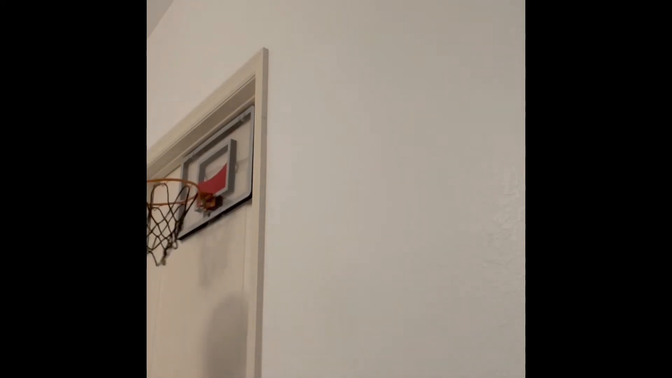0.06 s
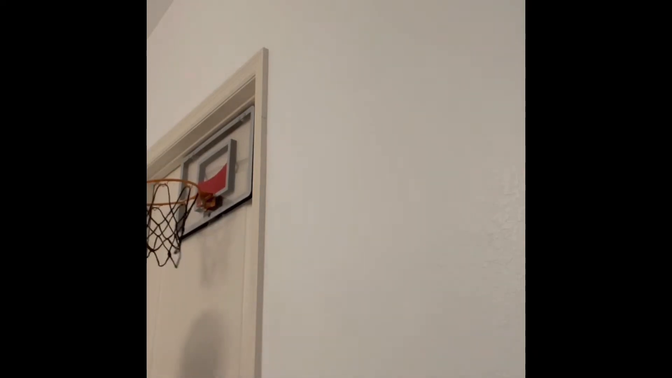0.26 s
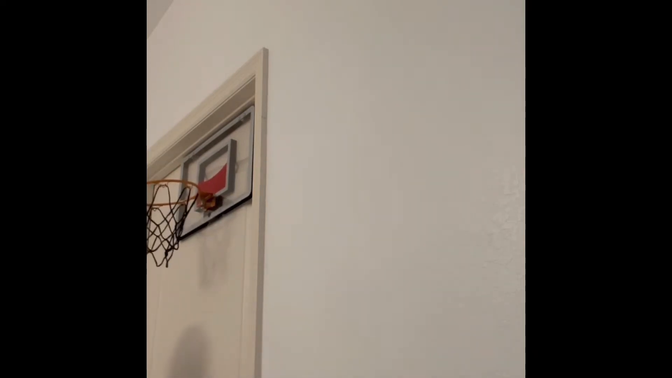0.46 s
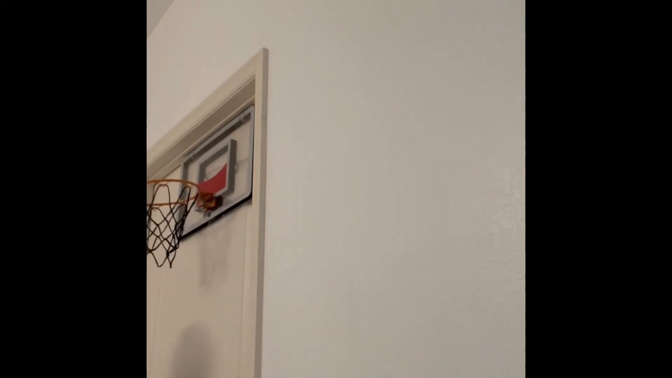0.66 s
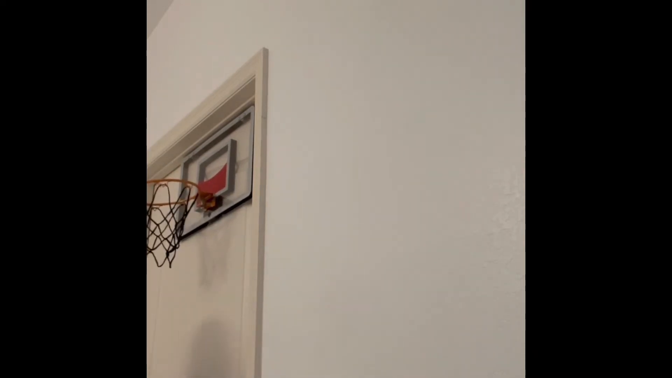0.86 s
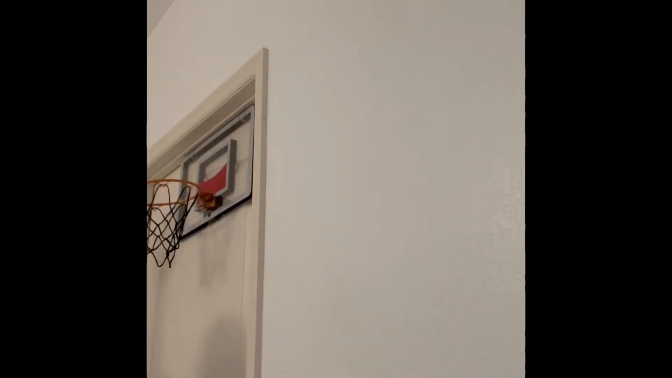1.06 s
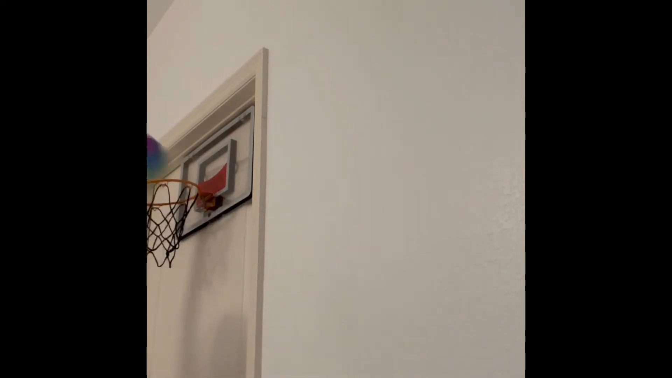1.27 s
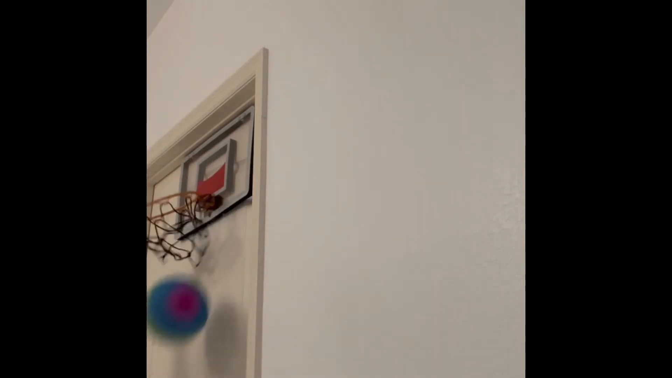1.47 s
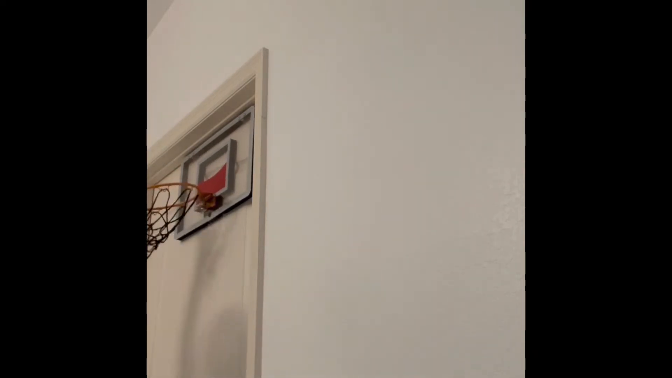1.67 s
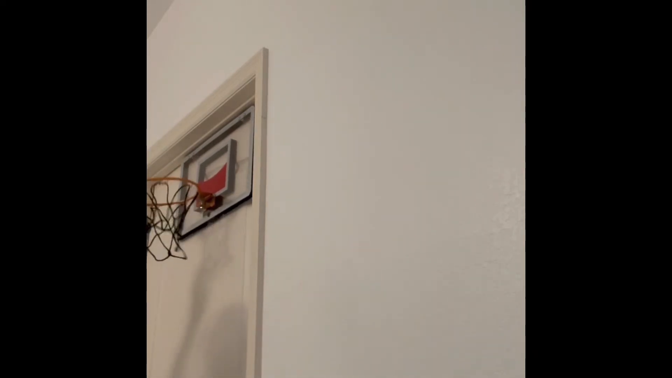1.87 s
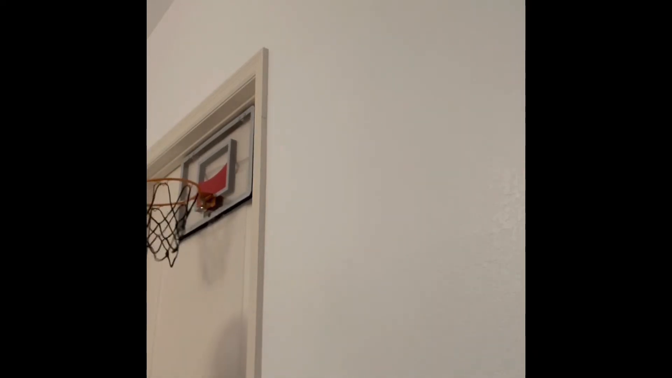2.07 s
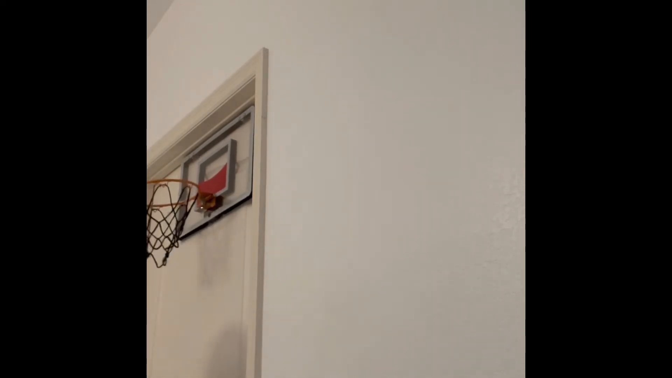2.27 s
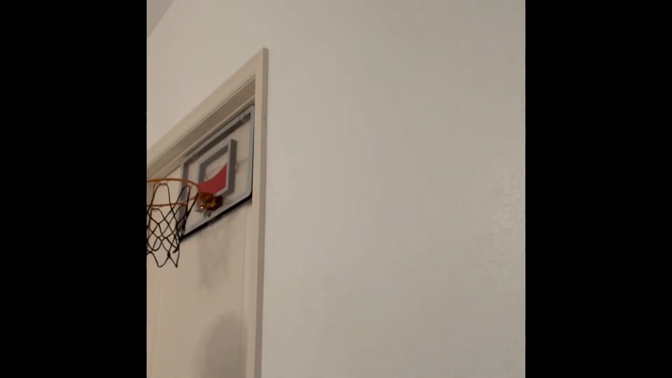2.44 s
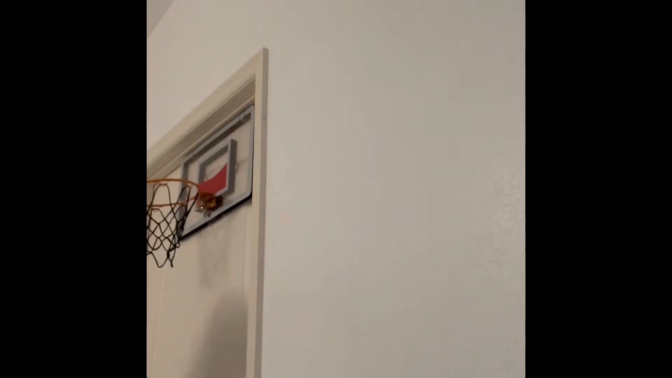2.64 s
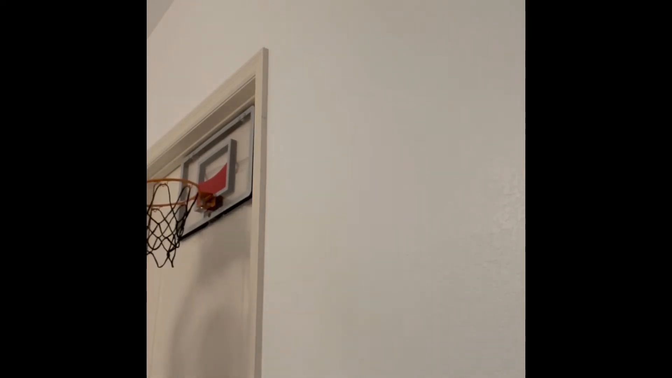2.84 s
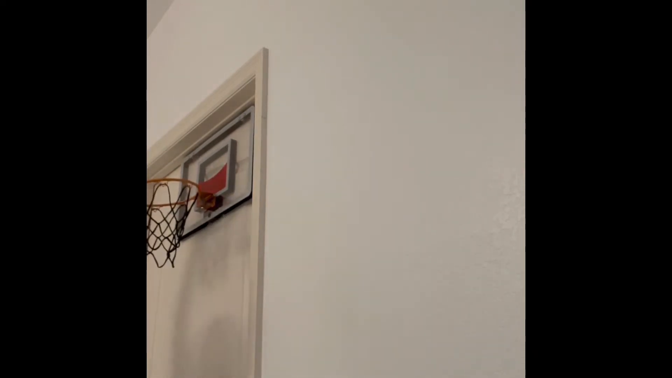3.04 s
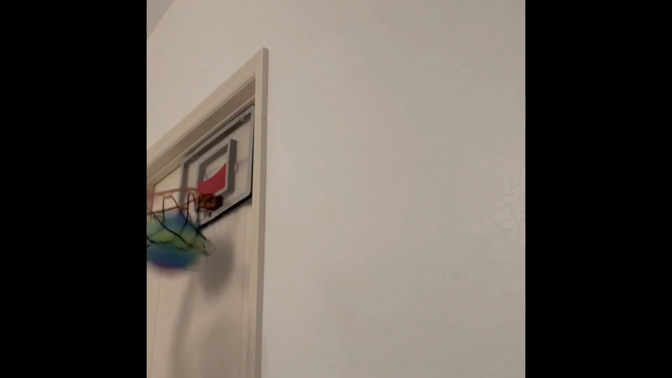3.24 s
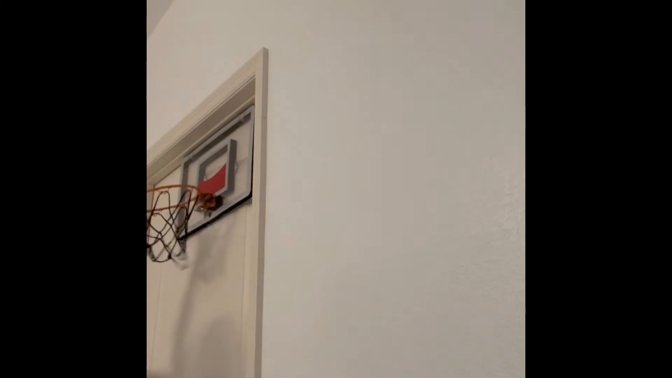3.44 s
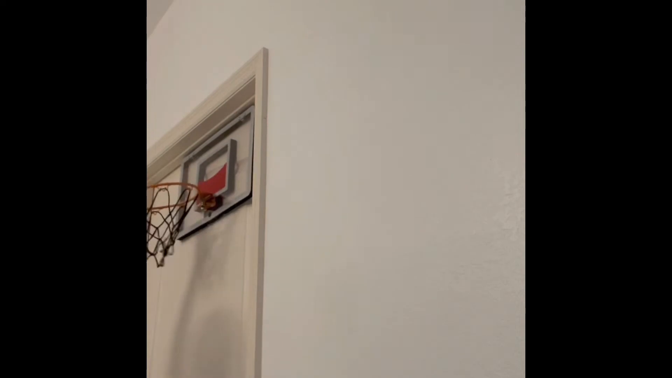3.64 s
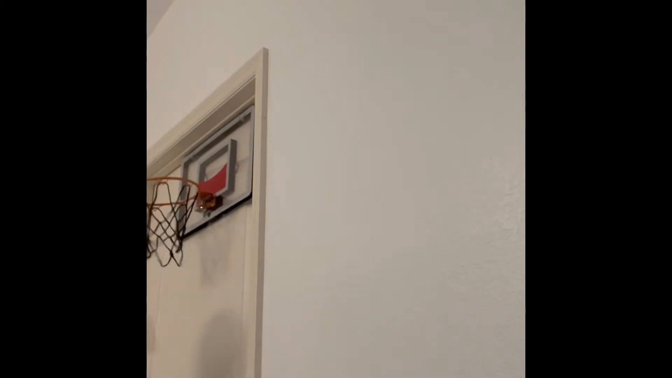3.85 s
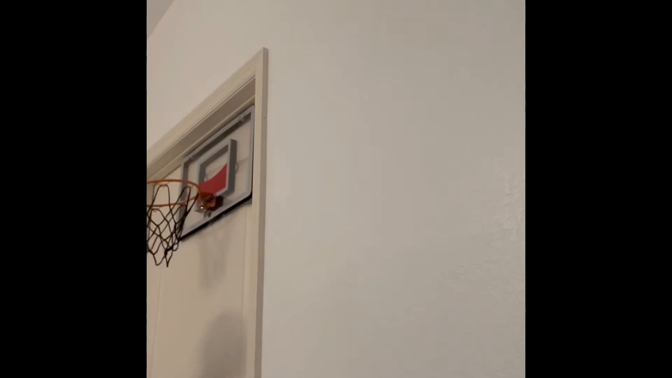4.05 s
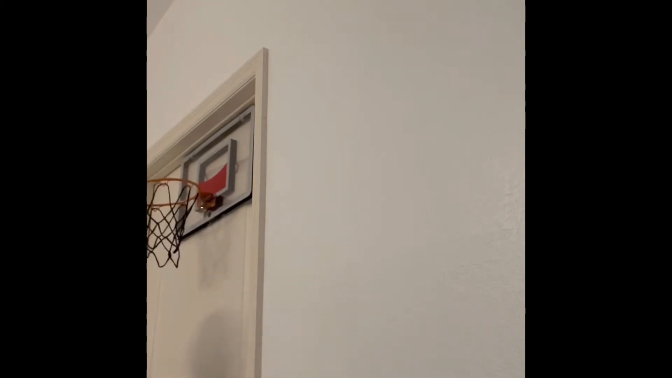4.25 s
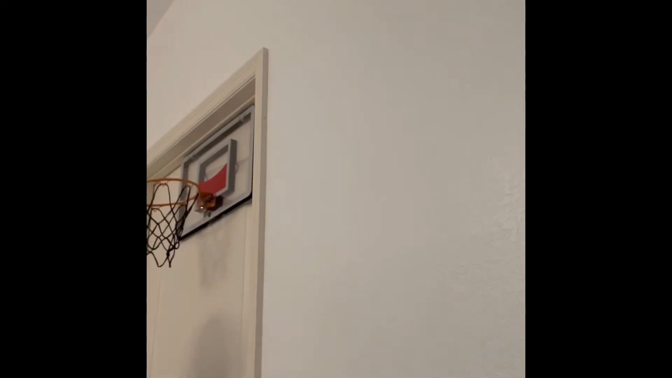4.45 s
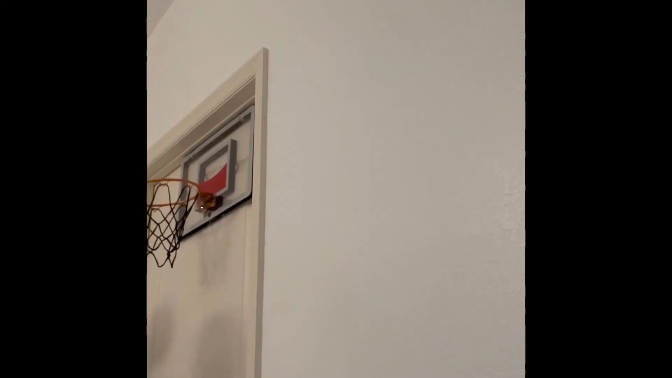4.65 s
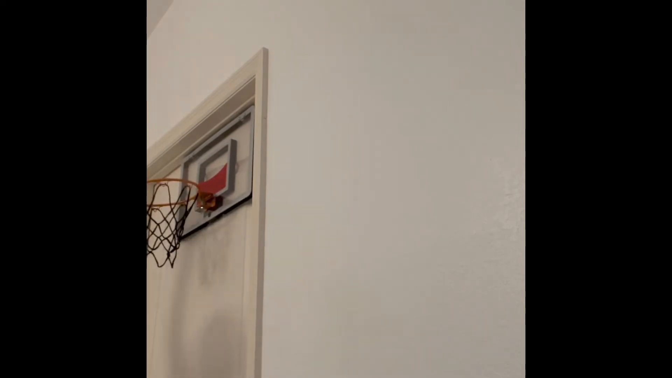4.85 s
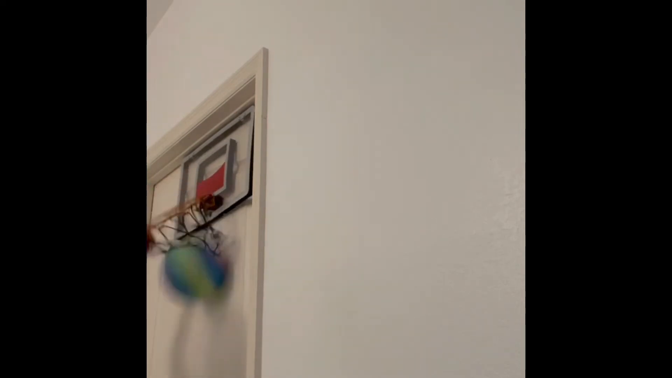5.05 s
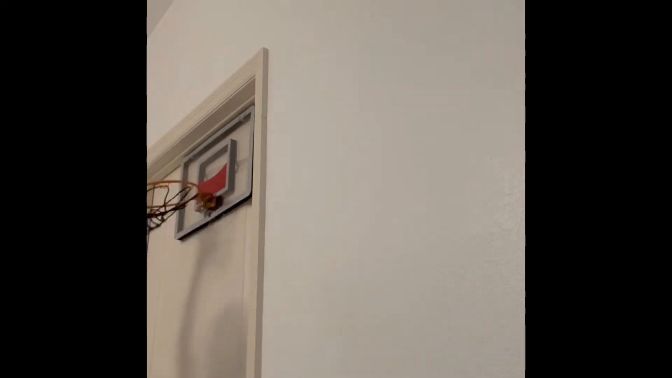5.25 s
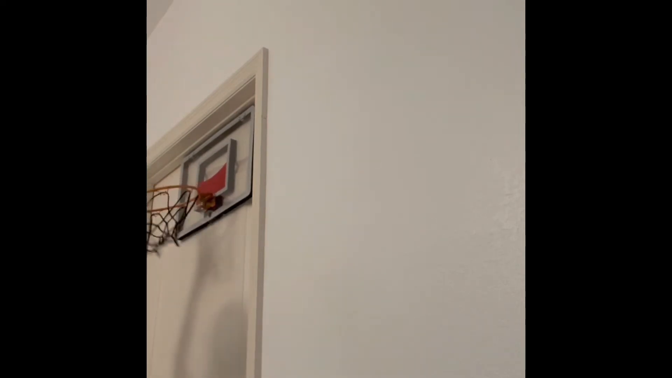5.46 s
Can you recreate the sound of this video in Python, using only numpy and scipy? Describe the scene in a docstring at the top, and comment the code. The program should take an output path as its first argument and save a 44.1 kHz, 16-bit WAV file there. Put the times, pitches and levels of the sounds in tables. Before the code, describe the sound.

In a bare, echoing room, a loose backboard clatters against a door three times while a hollow ball smacks and bounces below.

```python
"""Dunks on a door-hung hoop

Three dunks on a small hoop in a bare room, beginning as a ball bounces and ending on its last landing.
The backboard slams the door as runs of noise bursts, with steel rim and door panel as decaying modes.
The ball slaps the floor as noise bursts while its hollow body and enclosed air ring as modes.
Filtered-noise clothes rustle, soft steps and ticks fill the gaps over house noise and thin tones.
"""
import sys
import numpy as np
from scipy import signal
from scipy.fft import rfft, irfft
from scipy.io import wavfile
from scipy.ndimage import uniform_filter1d

SR = 44100
rng = np.random.default_rng(int(sys.argv[2]) if len(sys.argv) > 2 else 0)


def generate_wav(signal):
    """Clip the signal to [-1, 1] and save it as 16-bit WAV at the path in sys.argv[1]."""
    frames = np.transpose(np.atleast_2d(signal))
    scaled = np.clip(frames, -1, 1) * 32767
    pcm = np.round(scaled).astype(np.int16)
    wavfile.write(sys.argv[1], SR, pcm)


N = 242991
LEAD = SR // 2  # samples of run-in, so that sounds begun before time zero can ring on


def undb(db):
    """Level law: 20 dB is a tenfold amplitude."""
    return 10 ** (np.asarray(db) / 20)


def unit(x):
    """Normalisation to a root-mean-square of 1."""
    return x / np.sqrt(np.mean(x ** 2))


def colour(x, points):
    """Minimum-phase filtering: folding the cepstrum of the gain gives a causal response of energy 1."""
    hz, db = np.transpose(points)
    size = 4096
    bin_hz = np.arange(size // 2 + 1) * SR / size
    log_gain = np.interp(np.log(bin_hz + 1), np.log(hz), db) * np.log(10) / 20
    cepstrum = irfft(log_gain)
    cepstrum[1:size // 2] *= 2
    cepstrum[size // 2 + 1:] = 0
    response = irfft(np.exp(rfft(cepstrum)))
    response /= np.sqrt(np.sum(response ** 2))
    return signal.fftconvolve(x, response)[:len(x)]


def band(x, hz, width):
    """Simple resonance: two poles pass a band of the given width in Hz."""
    b, a = signal.iirpeak(min(hz, .45 * SR), hz / width, SR)
    return signal.lfilter(b, a, x)


def treble(x, hz):
    """High-pass filtering: keeps the part above hz."""
    return signal.sosfilt(signal.butter(4, hz, "high", fs=SR, output="sos"), x)


def decay(t, t60):
    """Exponential damping: the level falls 60 dB in t60 seconds."""
    return np.exp(-np.log(1000) * t / t60)


def ring(modes, scatter_db, seconds=.25):
    """Modal superposition: a blow excites damped modes, each by an amount set by where it lands."""
    hz, db, t60 = np.transpose(modes)[:, :, None]
    t = np.arange(int(seconds * SR)) / SR
    detune, strength = rng.standard_normal((len(modes), 2)).T[:, :, None]
    waves = np.sin(2 * np.pi * hz * (1 + 0.0084 * detune) * t) * decay(t, t60)
    gains = np.sign(detune) * undb(db + scatter_db * strength)  # random polarity and level
    return np.sum(gains * waves, axis=0)


def contact(spread, rise=1e-4):
    """Stochastic contact: a noise burst of micro-contacts gathers and dies, with energy 1."""
    t = np.arange(SR // 8) / SR
    envelope = np.exp(-t / max(spread, 1e-4)) * (1 - np.exp(-t / max(rise, 1e-5)))
    touch = rng.standard_normal(len(t)) * envelope
    return touch / np.sqrt(np.sum(touch ** 2))


def drawn_out(x, spread):
    """Distributed excitation: a swell of small contacts feeds in the same energy as one blow."""
    t = np.arange(SR // 8) / SR
    y = signal.fftconvolve(t * contact(spread), x)
    return y * np.sqrt(np.sum(x ** 2) / np.sum(y ** 2))


def thump(hz, t60):
    """Damped oscillator: one dying swing at a single pitch."""
    t = np.arange(SR // 2) / SR
    return np.sin(2 * np.pi * hz * t) * decay(t, t60)


def swell(s, hold, attack, release):
    """Amplitude envelope: rises into s, holds, then dies away."""
    t = np.arange(N) / SR - s
    return np.clip(1 + t / attack, 0, 1) ** 2 * np.exp(-np.maximum(t - hold, 0) / release)


def add(out, s, x):
    """Linear superposition: adds x at time s, after the run-in."""
    at = LEAD + int(s * SR)
    out[at:at + len(x)] += x[:len(out) - at]


# Spectrum of the house noise: pitch_hz [Hz], level_db [relative dB per Hz]
HOUSE_SPECTRUM = [(20, -20), (40, -2), (65, 7), (100, 1), (150, -11), (300, -11), (600, -14), (1200, -18),
                  (2500, -25), (5000, -30), (9000, -35.5), (16000, -33)]
# Thin appliance tones: pitch_hz [Hz], level_db [dB rms before the waver]
HUM_TONES = [(573, -59.5), (1130, -69.5), (2270, -76.5), (240, -66.5), (490, -67.5), (834, -69.5)]
HOUSE_DB = -49.5  # dB rms


def house():
    """Stationary noise with amplitude-modulated tones: a steady background and a wavering appliance."""
    t = np.arange(N) / SR
    out = undb(HOUSE_DB) * unit(colour(rng.standard_normal(N), HOUSE_SPECTRUM))
    for hz, db in HUM_TONES:
        waver = unit(uniform_filter1d(rng.standard_normal(N), size=4000))
        tone = np.sqrt(2) * np.sin(2 * np.pi * (hz * t + rng.random()))
        out += undb(db + 1.5 * waver) * tone
    return out


# Decay of the room: pitch_hz [Hz], t60_s [s]
ROOM_DECAY = [(60, 0.54), (150, 0.72), (400, 0.67), (1000, 0.77), (2500, 0.65), (6000, 0.57), (10000, 0.5),
              (15000, 0.14)]


def octave_slices():
    """Frequency-dependent absorption: half-octave filters, each with the room's decay time there."""
    hz, t60 = np.transpose(ROOM_DECAY)
    for f in 40 * 2 ** np.arange(0, 9, .5):
        edges = [f / 2 ** .25, min(f * 2 ** .25, .49 * SR)]
        sos = signal.butter(2, edges, "band", fs=SR, output="sos")
        yield sos, np.interp(np.log(f), np.log(hz), t60)


# Standing waves of the room: pitch_hz [Hz], level_db [relative dB], t60_s [s]
STANDING_WAVES = [(49.4, -0.5, 0.81), (64.6, 4.5, 0.6), (80, 12, 0.1), (109.9, 9.5, 0.46), (188.6, -9, 1)]


def room(x, wet_db, modes_db, build_s):
    """Convolution reverberation: direct sound, echoes that keep the source's ring, and standing waves."""
    t = np.arange(SR) / SR
    tail = np.zeros(SR)
    for sos, t60 in octave_slices():
        tail += signal.sosfilt(sos, rng.standard_normal(SR)) * decay(t, t60)
    response = undb(wet_db) * tail * (1 - np.exp(-t / build_s))
    response += undb(modes_db) * ring(STANDING_WAVES, 0.79, seconds=1)
    response[0] += 1  # direct sound
    return signal.fftconvolve(x, response)[:len(x)]


def wash(x, wet_db, build_s):
    """Diffuse-field energy balance: each band stores the energy of the cracks and lets it leak away."""
    out, fill = x.copy(), np.exp(-1 / (build_s * SR))
    for sos, t60 in octave_slices():
        leak = np.exp(-2 * np.log(1000) / (t60 * SR))
        poles = np.convolve([1, -fill], [1, -leak])
        energy = signal.lfilter([1 - fill], poles, signal.sosfilt(sos, x) ** 2)
        noise = unit(signal.sosfilt(sos, rng.standard_normal(len(x))))
        out += undb(wet_db) * np.sqrt(np.abs(energy)) * noise
    return out


# Clothes and small moves: start_s [s], hold_s [s], level_db [dB], brightness [0-1]
RUSTLES = [(0.477, 0.096, -61.5, 0.44), (0.615, 0.09, -51.5, 0.72), (1.085, 0.28, -59, 0.18),
           (2.302, 0.088, -57.5, 0.5), (2.516, .33, -61.5, 0.45), (3.13, .02, -60, 0.1),
           (4.744, 0.12, -61.5, .45)]
# Narrow whistle before a landing: start_s [s], hold_s [s], level_db [dB]
WHISTLE = (1.705, .07, -50)
# Small ticks: start_s [s], level_db [dB], pitch_hz [Hz]
SMALL_TICKS = [(2.839, -23, 4110), (4.5372, -30, 6030), (4.601, -32.5, 14050), (4.745, -22, 3500)]
# Soft footfalls: start_s [s], level_db [dB], pitch_hz [Hz]
FOOTFALLS = [(0.642, -40, 101), (0.799, -50, 77), (1.038, -47.5, 79.4), (1.189, -43.5, 81.5),
             (2.721, -40, 275), (2.797, -42, 63)]
RUSTLE_ATTACK_S, RUSTLE_RELEASE_S = 0.032, 0.041
WHISTLE_EDGE_S = .025


def player():
    """Filtered friction noise and damped impulses: grainy clothes, a whistle, ticks and soft steps."""
    out = np.zeros(LEAD + N)
    flutter = unit(uniform_filter1d(rng.standard_normal(N), size=300))
    grain = rng.standard_normal(N) * undb(1.4 * flutter)
    low, high = unit(band(grain, 3000, 1200)), unit(band(grain, 5300, 4000))
    for s, hold, db, brightness in RUSTLES:
        share = np.clip(brightness, 0, 1)
        cloth = (1 - share) * low + share * high
        out[LEAD:] += undb(db) * cloth * swell(s, hold, RUSTLE_ATTACK_S, RUSTLE_RELEASE_S)
    s, hold, db = WHISTLE
    whistle = unit(band(rng.standard_normal(N), 2880, 250))
    out[LEAD:] += undb(db) * whistle * swell(s, hold, WHISTLE_EDGE_S, WHISTLE_EDGE_S)
    for s, db, hz in SMALL_TICKS:
        add(out, s, undb(db) * band(contact(0.002), hz, hz / 4))
    for s, db, hz in FOOTFALLS:
        add(out, s, undb(db) * thump(hz, 0.063))
    return out


# Thin metallic ring after one rebound: start_s [s], level_db [dB], pitch_hz [Hz], t60_s [s]
METAL_RING = (2.12, -49, 3742, .7)


def thin_ring(out):
    """Single-mode resonance: adds one thin metallic ring."""
    s, db, hz, t60 = METAL_RING
    add(out, s, undb(db) * thump(hz, t60))


# Hard landings and soft rebounds, each of two touches: start_s [s], slap_db [dB],
# treble_db [dB re slap], body_db [dB], air_db [dB re body], gap_s [s to second touch],
# second_slap_db [dB re first slap]
LANDINGS = [(-.19, 15, -14, -5.5, -22, .009, -10), (0.1256, -3, -8.5, -20, -12.5, .044, 1.5),
            (1.7996, 17.5, -1.5, -11, -6, .009, 4), (2.0906, -2.5, -6, -20.5, -13, .029, -22),
            (3.6323, 23.5, -7, -10, -7.5, .0083, -4.5), (3.9591, -5.5, -7.5, -19, -16.5, 0.029, 3.5),
            (5.3644, 24, -6, -9, -7, 0.0097, -7)]
# Spectrum of the skin's slap: pitch_hz [Hz], level_db [relative dB per Hz]
SLAP_SPECTRUM = [(100, -12), (300, -12), (430, 0), (650, -9), (1000, -12), (2300, -14), (4000, -15),
                 (6000, -17.5), (8000, -26.5), (12000, -52.5)]
# Modes of the hollow body: pitch_hz [Hz], level_db [relative dB], t60_s [s]
BODY_MODES = [(182, -9, 0.16), (276.4, -4.5, 0.056), (342.8, -7.5, 0.11), (377.4, -0.5, 0.083),
              (430, 1, 0.075), (463, -5, 0.064), (571, 0, 0.03), (762, -6, 0.026), (970, -8, 0.021)]
# Air modes inside the ball: pitch_hz [Hz], level_db [relative dB], t60_s [s]
AIR_MODES = [(1350, -2, .09), (1390, 0, .12), (1464, -3, .07), (2250, -9, .09)]
SLAP_PER_GAP, RISE_PER_GAP = 0.34, 0.018  # slap decay and rise times as shares of the gap
SECOND_TREBLE_DB, SECOND_BODY_DB = -13.5, -4.5  # changes at the duller second touch
ROLL_S = .008  # spread of the contacts that feed the body
THUD_DB = -5  # floor thud re the body


def ball():
    """Impact and shell resonance: skin slaps, the hollow ball rings, the floor thuds; slaps and rings."""
    slap, top, body = np.zeros((3, LEAD + N))
    for first, slap_db, treble_db, body_db, air_db, gap, second_db in LANDINGS:
        touches = (
            (first, slap_db, treble_db, body_db),
            (first + gap, slap_db + second_db, treble_db + SECOND_TREBLE_DB, body_db + SECOND_BODY_DB))
        for s, skin_db, top_db, db in touches:
            touch = contact(SLAP_PER_GAP * gap, RISE_PER_GAP * gap)  # wider gap: longer, softer slap
            add(slap, s, undb(skin_db) * touch)
            add(top, s, undb(skin_db + top_db) * touch)
            add(body, s, undb(db) * drawn_out(ring(BODY_MODES, 1.7), ROLL_S))
            add(body, s, undb(db + air_db) * drawn_out(ring(AIR_MODES, 0.94, seconds=.5), ROLL_S))
            add(body, s + gap / 2, undb(db + THUD_DB) * thump(78, 0.13))
    return colour(slap, SLAP_SPECTRUM) + treble(top, 7800), body


# Ball brushing free of the net: start_s [s], level_db [dB], decay_s [s]
NET_BRUSHES = [(3.405, -11, .012), (3.417, -9.5, 0.011), (5.24, -24, .006)]


def net():
    """Friction noise: short treble bursts as the ball brushes free of the net."""
    out = np.zeros(LEAD + N)
    for s, db, spread in NET_BRUSHES:
        add(out, s, undb(db) * contact(spread, rise=.004))
    return treble(out, 2500)


# Backboard knocks, a quick run per dunk: start_s [s], door_db [dB], crack_db [dB],
# treble_db [dB re crack], thump_db [dB]
BOARD_KNOCKS = [(1.3123, -16, 11, -21, -47), (1.3248, -15, 16, -11.5, -34), (1.3405, -13, 15.5, -27, -17),
                (1.359, -30, 11.5, -11.5, -16), (1.3797, -22, 5, -18.5, -40.5), (1.4, -23, -12.5, -22, -14),
                (1.429, -25.5, -21, -17.5, -8.5), (1.467, -28, -27, -17, -23.5),
                (3.1816, -18.5, 6, -17, -42), (3.196, -22.5, 14.5, -19, -25), (3.2107, -25, 13, -40, -12.5),
                (3.226, -21.5, -8, -16, -41.5), (3.242, -32, 4.5, -31.5, -45.5),
                (3.2879, -30.5, -22, -18, -27.5), (4.957, -28.5, 0, -22, -39), (4.9853, -24, 7, -9.5, -18),
                (5.002, -22.5, 9, -15, -10), (5.0269, -23, 12.5, -15.5, -31), (5.053, -41, 8.5, -20, -22),
                (5.0976, -35, -11, -5, -16)]
# Spectrum of a crack: pitch_hz [Hz], level_db [relative dB per Hz]
CRACK_SPECTRUM = [(300, -1), (700, 4.5), (1300, -5.5), (2000, -12.5), (2600, -8.5), (3300, -8.5),
                  (4200, -17), (6000, -17.5), (8000, -31), (12000, -51)]
# Modes of the steel rim: pitch_hz [Hz], level_db [relative dB], t60_s [s]
RIM_MODES = [(3150, -3, 0.045), (3380, -0.5, 0.033), (7000, -5, 0.04), (7300, -11.5, .015),
             (8060, -4.5, 0.02), (8700, -8, .015), (9250, -8.5, .025), (9800, -9.5, 0.016),
             (13800, -4.5, .015), (14300, -13.5, 0.017)]
# Modes of the door panel: pitch_hz [Hz], level_db [relative dB], t60_s [s]
DOOR_MODES = [(118, -7.5, 0.09), (190, -3.5, 0.1), (252.7, -3, 0.058), (336.3, 7.5, 0.041),
              (438.6, 7.5, 0.037), (523, -2.5, 0.075), (648, -5, .04), (806, -8, 0.075), (910, -0.5, 0.028),
              (1310, -10.5, 0.018), (1560, -12, 0.025)]
CHATTER_S, KNOCK_RISE_S = 0.0073, 0.0047  # the loose board never lands in one clean tick
RIM_RING_DB = -21.5  # re the treble of a knock
DOOR_SCATTER_DB = 2.5


def dunks():
    """Impact excitation of plates: knocks crack, ring the rim, drive the door; cracks and rings."""
    crack, top, body = np.zeros((3, LEAD + N))
    for s, door_db, crack_db, top_db, thump_db in BOARD_KNOCKS:
        touch = contact(CHATTER_S, KNOCK_RISE_S)
        add(crack, s, undb(crack_db) * touch)
        add(top, s, undb(crack_db + top_db) * touch)
        add(body, s, undb(crack_db + top_db + RIM_RING_DB) * ring(RIM_MODES, 1.5))
        add(body, s, undb(door_db) * drawn_out(ring(DOOR_MODES, DOOR_SCATTER_DB), CHATTER_S))
        add(body, s, undb(thump_db) * thump(62, 0.076))
    return colour(crack, CRACK_SPECTRUM) + treble(top, 7100), body


def scene():
    """Superposition of sources: bursts wash diffusely, rings echo, and the house noise lies beneath."""
    cracks, door = dunks()
    slaps, rings = ball()
    near = wash(cracks + net() + slaps, -32.5, 0.00062)
    near += room(door, -28, -63.5, 0.011)
    near += room(rings + player(), -31, -58.5, 0.0034)
    thin_ring(near)
    return (near[LEAD:] + house())[None]


# Microphone response, with port dip and peak: pitch_hz [Hz], level_db [relative dB]
MIC_RESPONSE = [(100, -1), (8000, -5), (9500, -5.5), (10800, -10.5), (12500, -4.5), (14500, 0.5),
                (16000, 0)]
TOP_HZ = 15900  # upper limit of the passband


def record(dry):
    """Band-limited transduction: a phone colours treble, trims deep bass, clips peaks and cuts the top."""
    coloured = colour(dry[0], MIC_RESPONSE)
    trimmed = signal.sosfilt(signal.butter(3, 38, "high", fs=SR, output="sos"), coloured)
    clipped = np.clip(trimmed, -1, 1)
    top_cut = signal.ellip(10, .2, 70, TOP_HZ, fs=SR, output="sos")
    return signal.sosfilt(top_cut, clipped)[None]


dry = scene()
out = record(dry)
generate_wav(out)
```